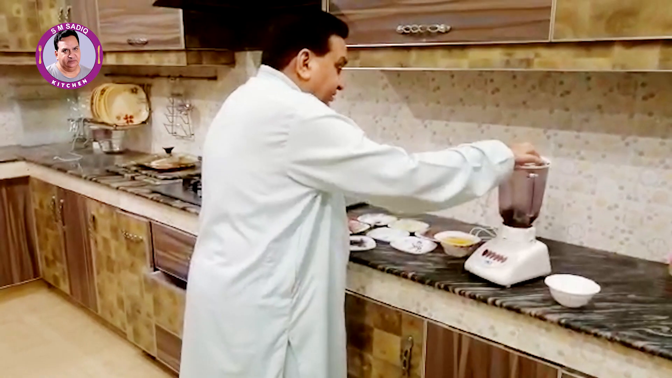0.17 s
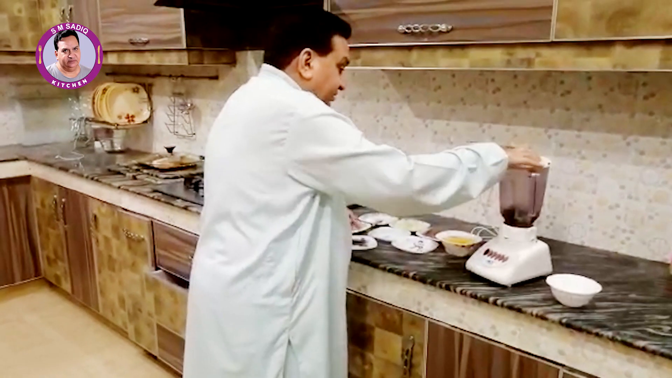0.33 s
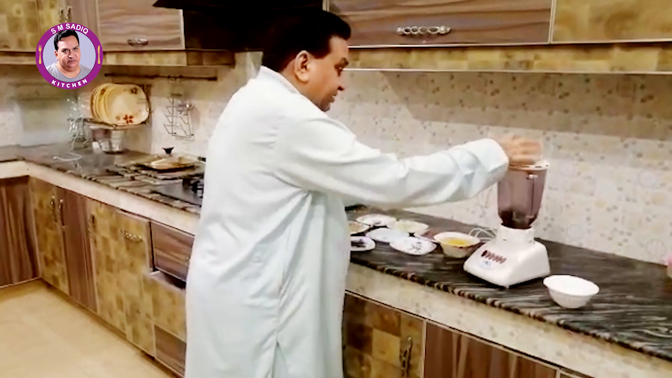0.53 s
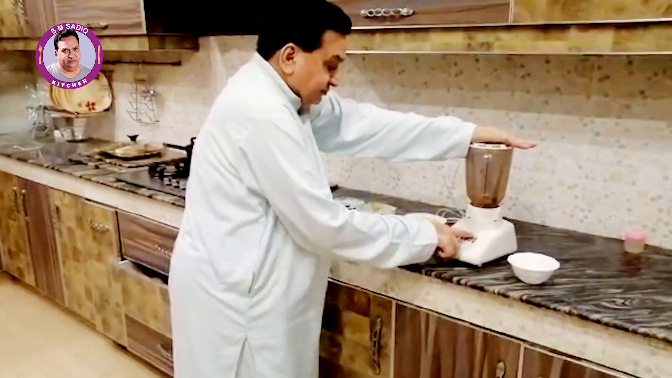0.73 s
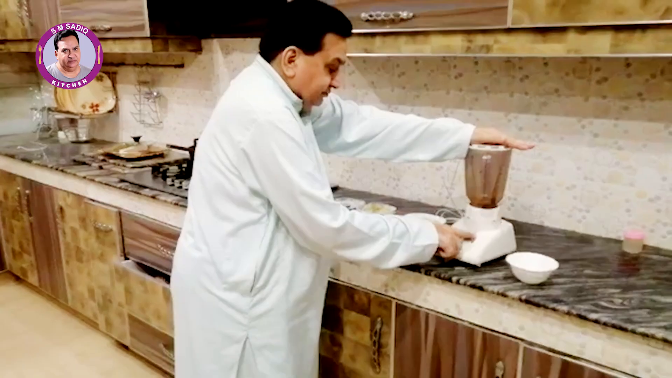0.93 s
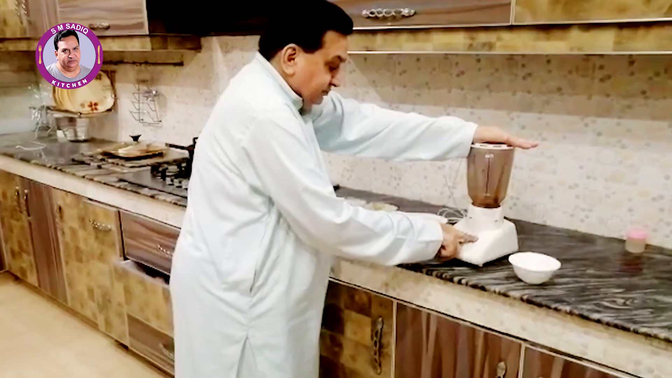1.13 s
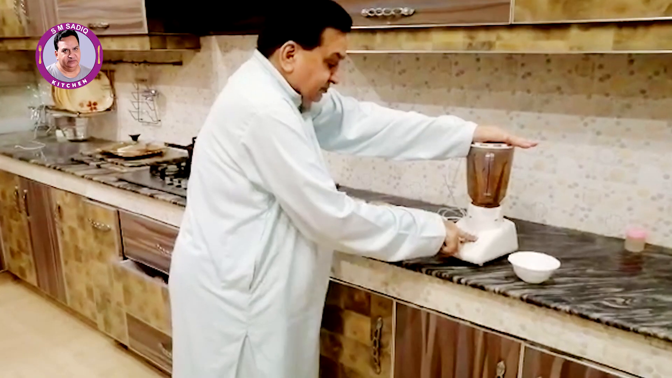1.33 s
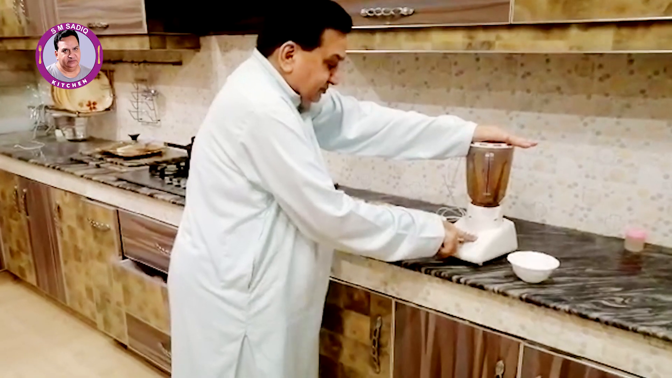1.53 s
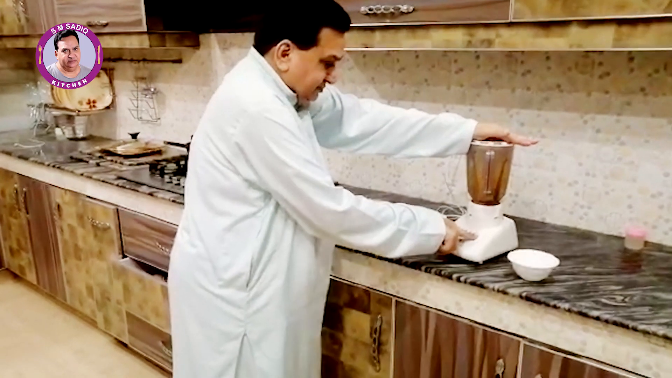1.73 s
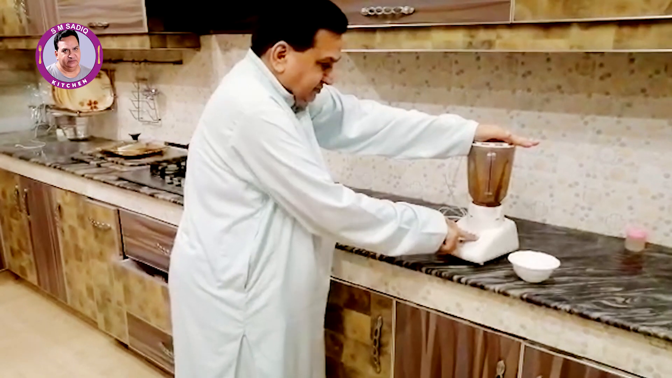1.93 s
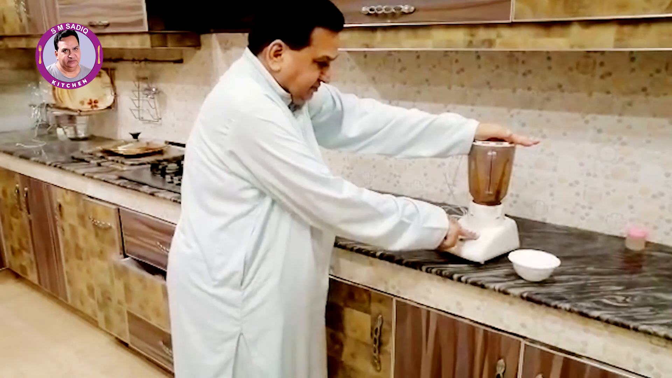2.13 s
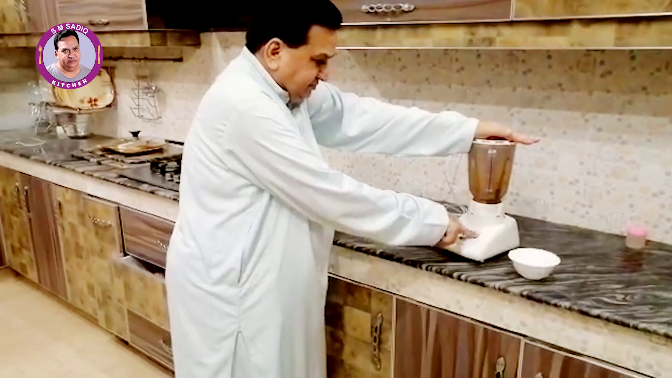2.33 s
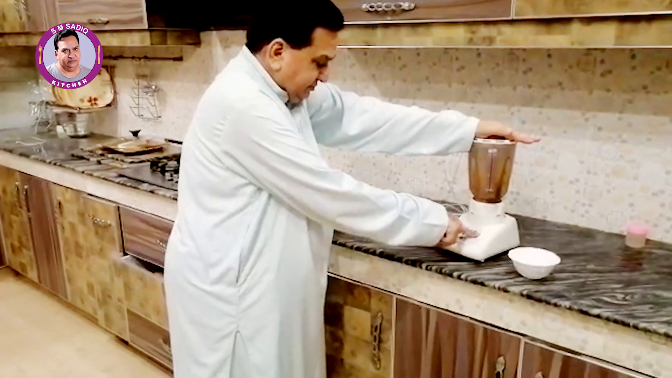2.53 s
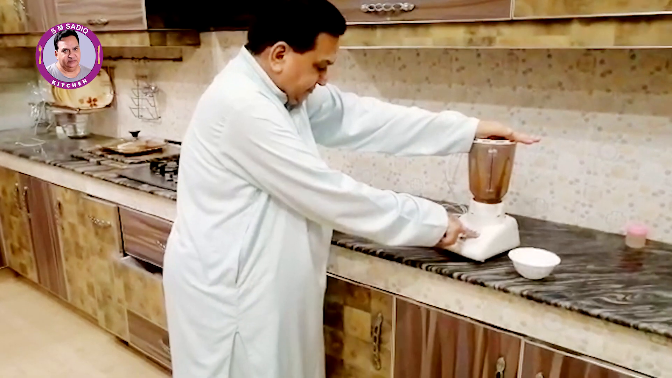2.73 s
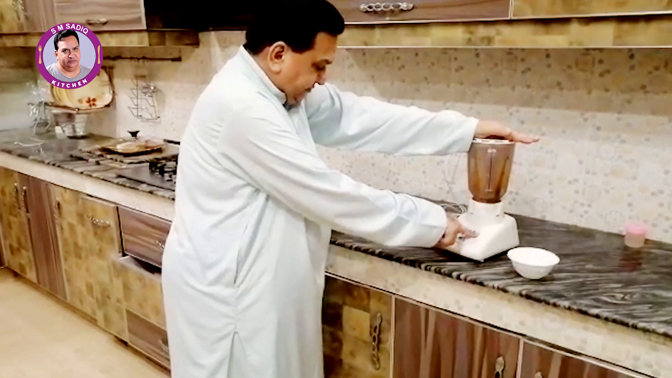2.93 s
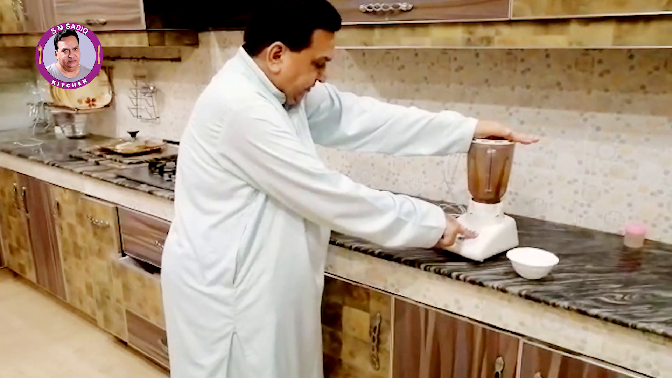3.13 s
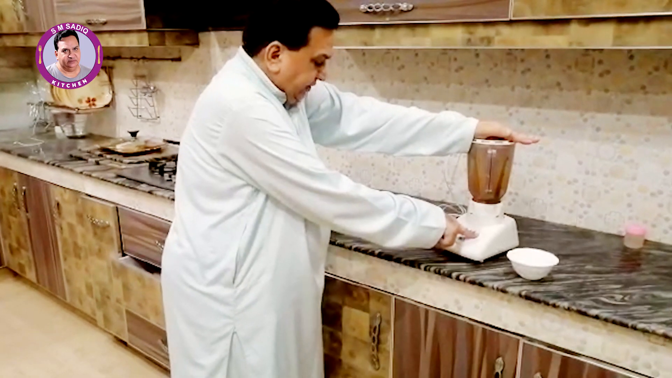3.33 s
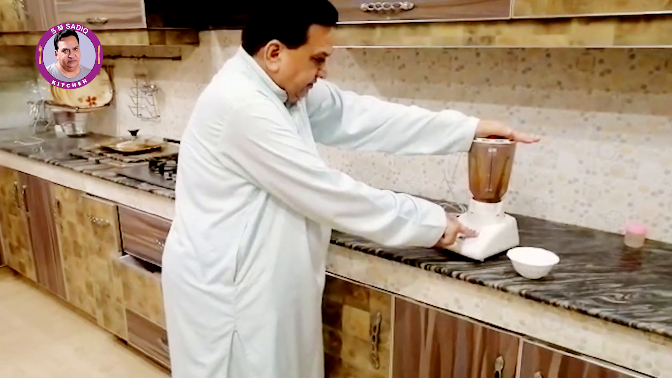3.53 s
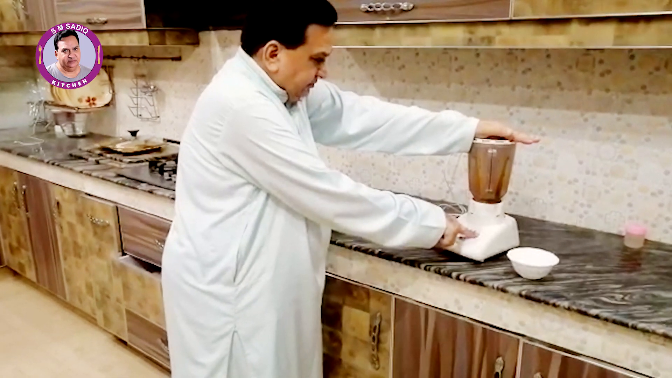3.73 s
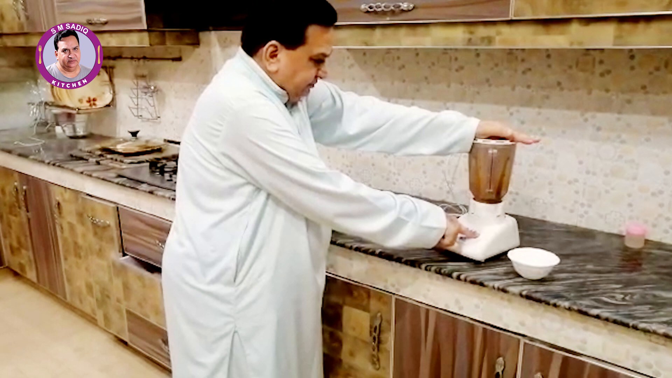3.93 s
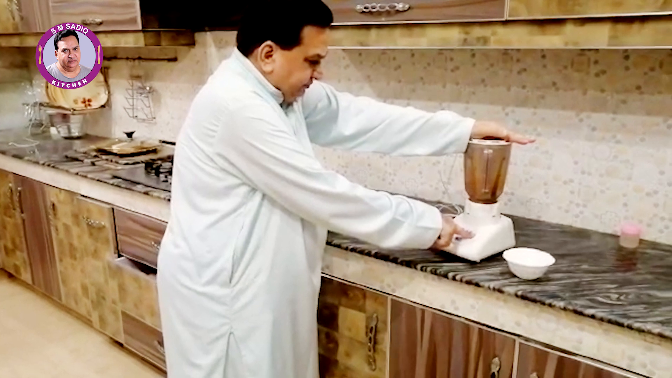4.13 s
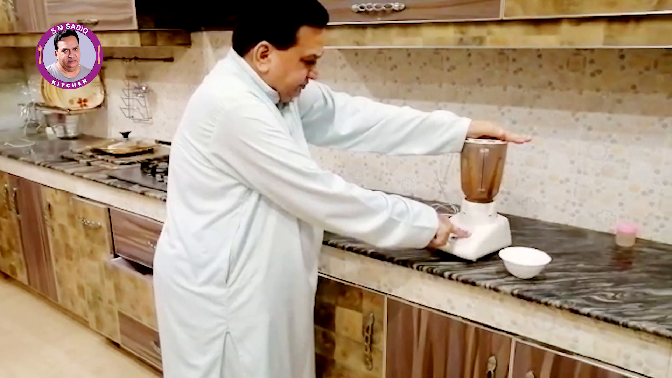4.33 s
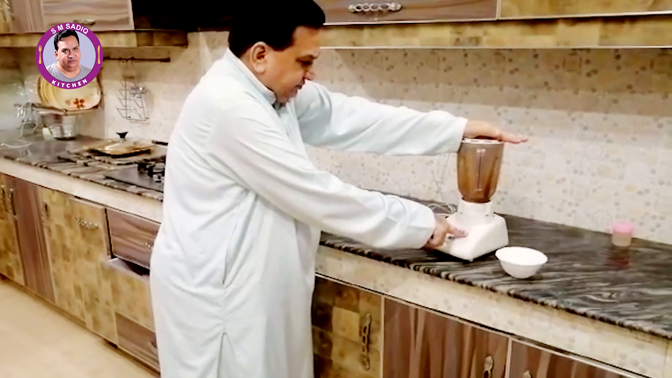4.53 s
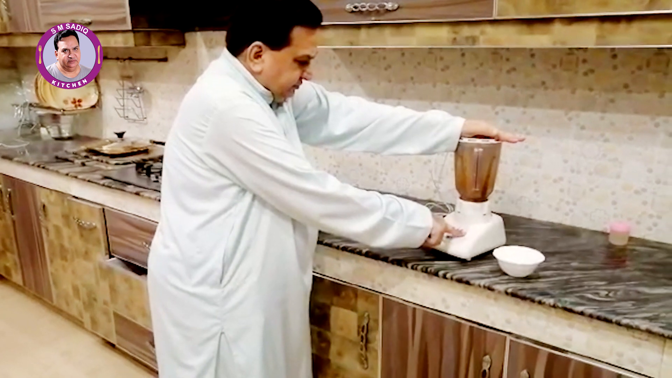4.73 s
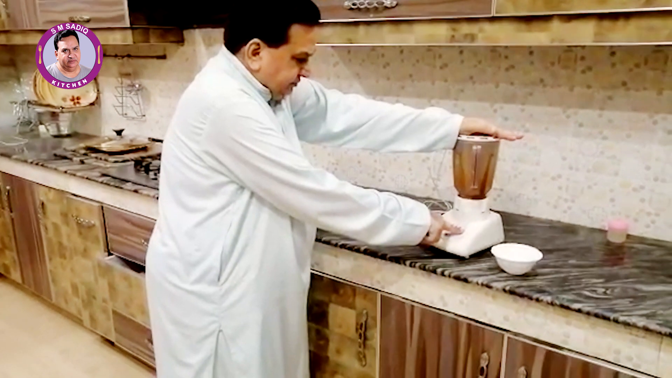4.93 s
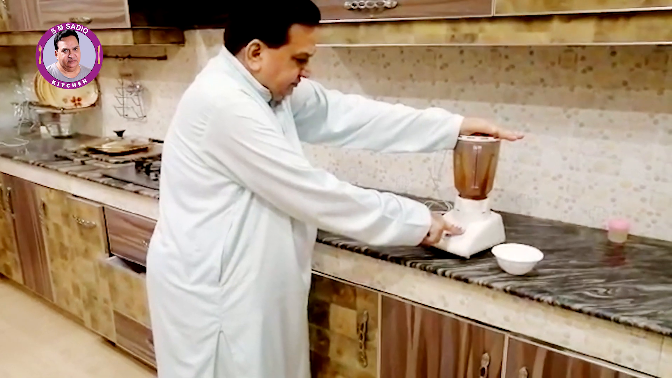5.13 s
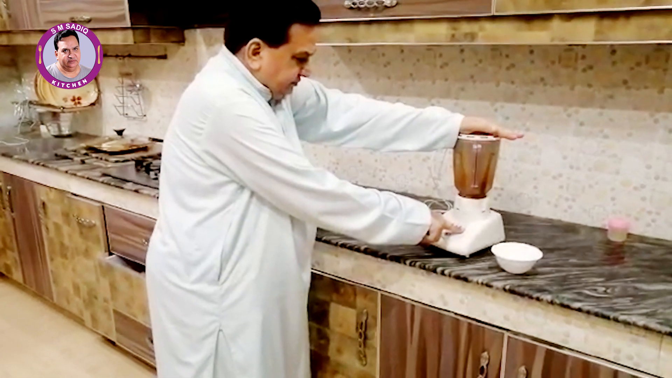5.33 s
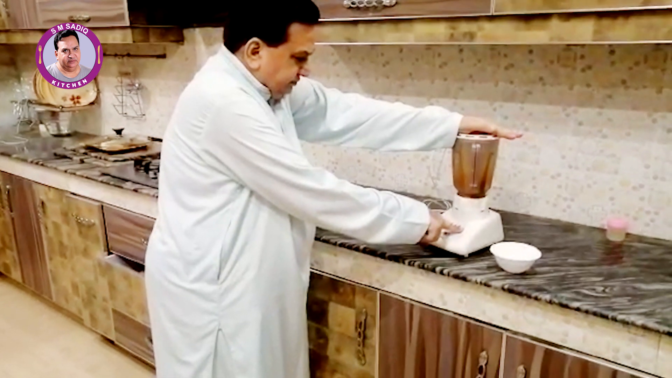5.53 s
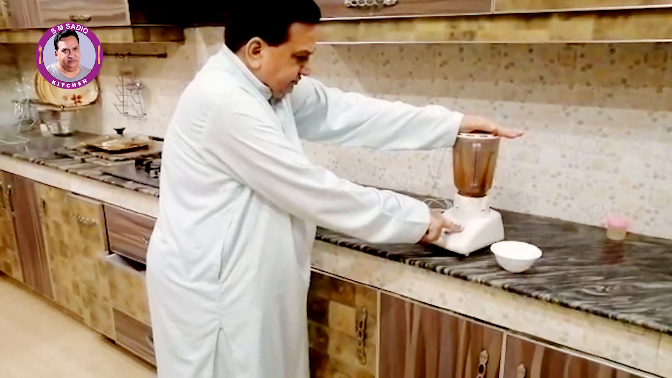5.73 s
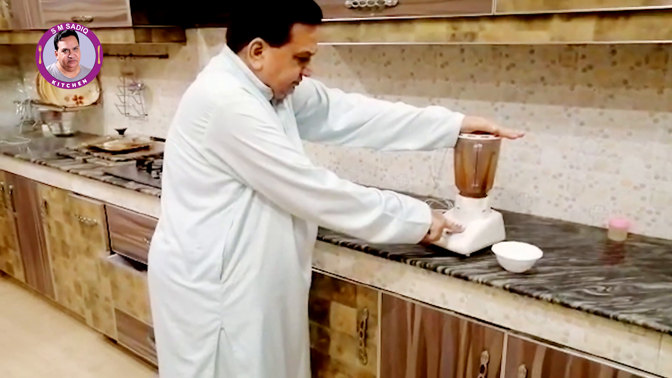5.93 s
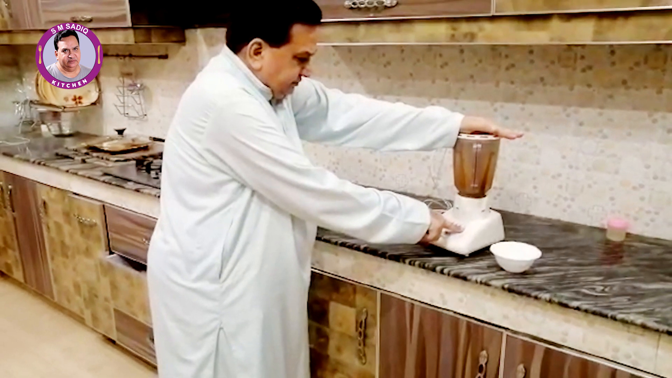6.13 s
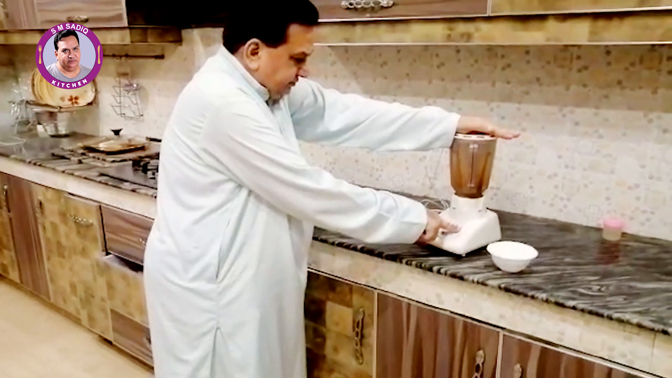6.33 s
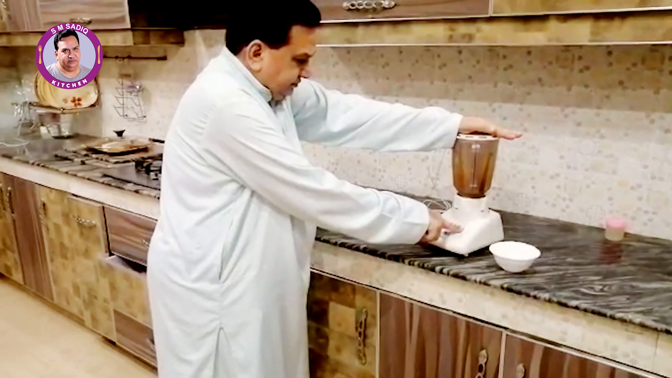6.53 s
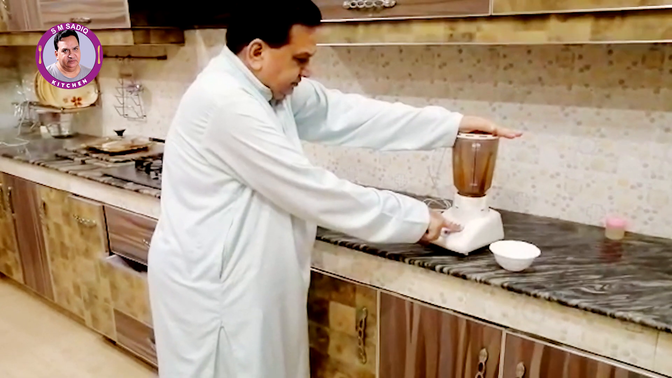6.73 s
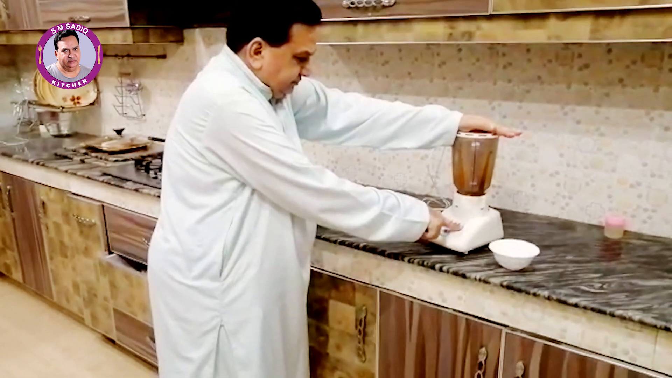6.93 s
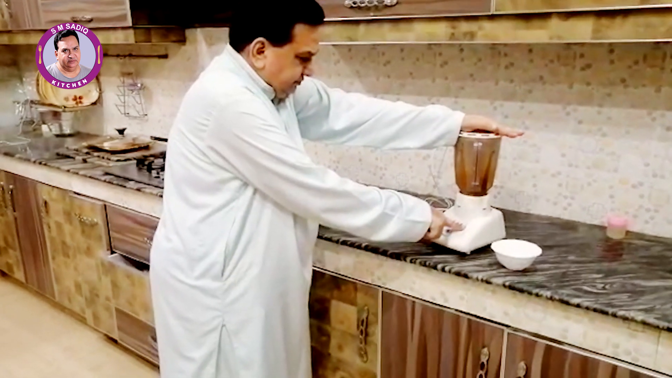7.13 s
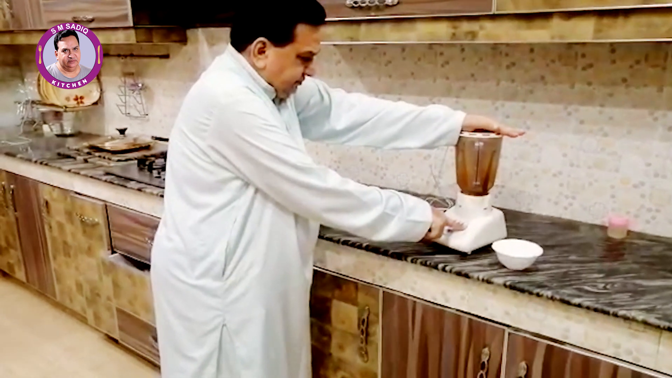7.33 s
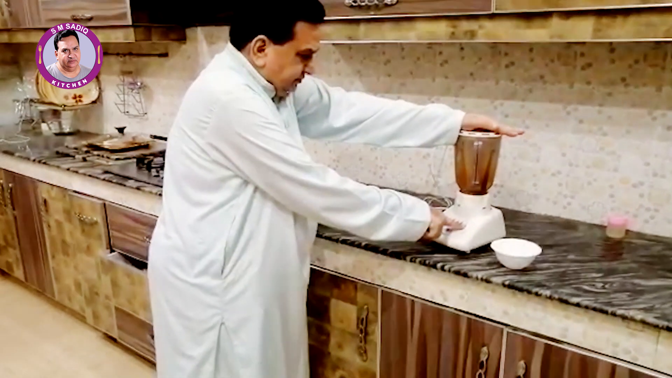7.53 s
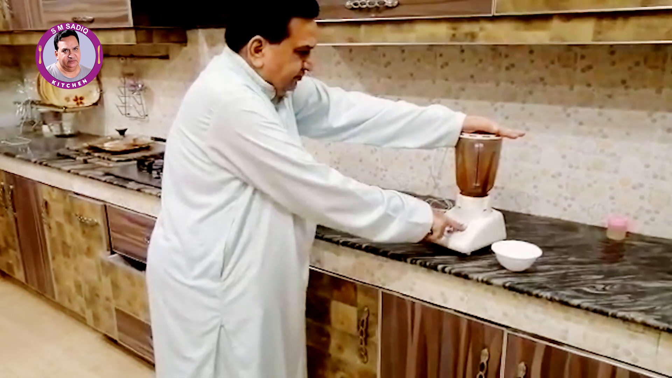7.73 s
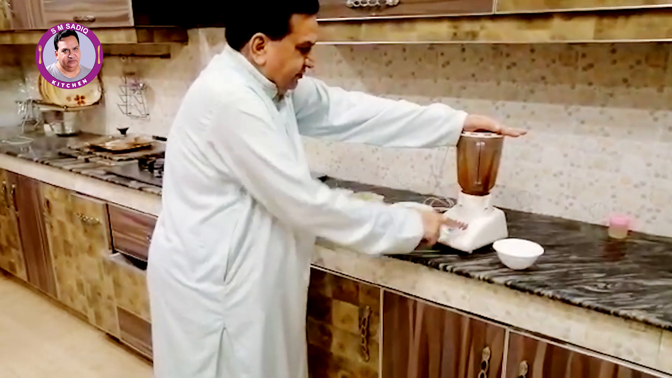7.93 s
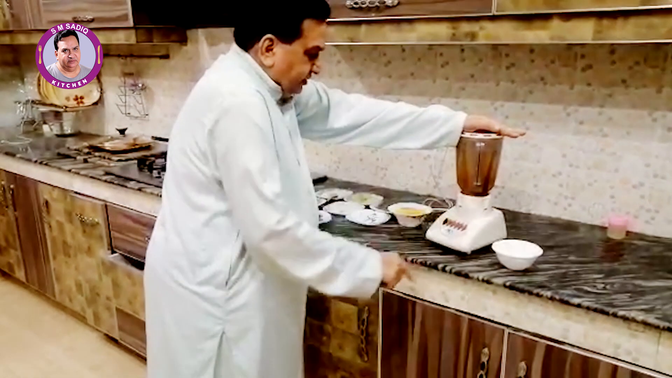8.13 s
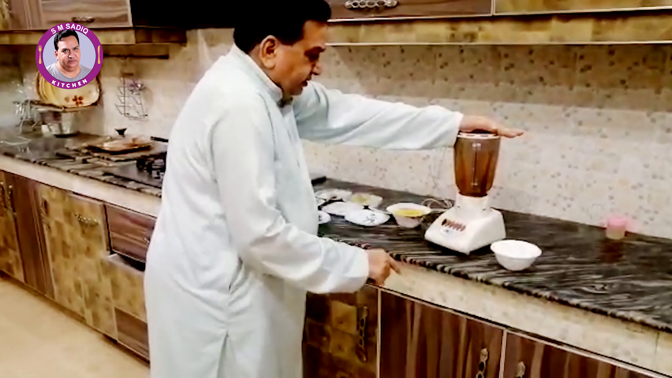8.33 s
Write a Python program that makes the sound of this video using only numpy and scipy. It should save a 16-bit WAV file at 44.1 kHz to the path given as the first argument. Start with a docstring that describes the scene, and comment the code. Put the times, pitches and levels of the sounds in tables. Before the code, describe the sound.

A quiet tiled kitchen with a faint noise floor. At about 0.05 to 0.1 s a plastic lid knocks onto a blender jar in a quick cluster, hollow and low, with another tap near 0.37 s. Near-silence follows until a small button click at 1.22 s. The motor starts at once, its pitch leaping up and then creeping higher; around 1.35 s there is a very short squeal, and by 1.6 s the blades have caught the liquid with a surge and a gulp. From about 2 to 7.9 s a loud, steady drone near 300 Hz holds, wavering slightly, with buzz, high motor whine, raspy churning and fluttering spray hiss. Brief gulps come near 3.1, 4.8, 6.5 and 7.7 s, and the pitch edges upward late. At 7.88 s the power cuts: the whine vanishes, the tone glides down and liquid slosh swells, still coasting at the end.

```python
"""A blender drones and churns in a tiled kitchen: low orders of its shaft, turning up to about 300 times
a second, glide through standing waves. Turbulence in the liquid is filtered noise; air and spray hiss.
The motor adds coupling buzz, commutator whine and fan whistle, all locked to the angle of the shaft.
First a lid knocks onto the jar and a button clicks, as noise cracks and decaying plastic modes;
at the end the motor is switched off and the shaft starts to coast down."""
import sys
import numpy as np
from scipy import signal
from scipy.fft import rfft, irfft, next_fast_len
from scipy.io import wavfile
from scipy.ndimage import uniform_filter1d

SR = 44100
rng = np.random.default_rng(int(sys.argv[2]) if len(sys.argv) > 2 else 0)


def generate_wav(signal):
    """Clip the signal to [-1, 1] and save it as 16-bit WAV at the path in sys.argv[1]."""
    frames = np.transpose(np.atleast_2d(signal))
    scaled = np.clip(frames, -1, 1) * 32767
    pcm = np.round(scaled).astype(np.int16)
    wavfile.write(sys.argv[1], SR, pcm)


N = 368631
TIME = np.arange(N) / SR

# response of the radiating jar and housing: f/Hz, left level/dB, right level/dB
BODY_RESPONSE = [(83, -59, -57), (279, -7, -1.5), (381, -13, -7.5), (543, -3.5, 1), (1630, 0.0, -4),
                 (2600, -6, -3.5), (3464, -3, -1), (3710, -16, -8), (4480, -11.5, -14.5), (5260, -4, -4.5),
                 (7020, -11, -0.5), (8470, -6, -18.5), (8900, -11.5, -17.5), (13600, -25.5, -22.5),
                 (15000, -27, -25.5)]
# air pockets caught by the blades: t/s, slosh level/dB, spray level/dB, decay time/s, speed sag/(turns/s)
AIR_POCKETS = [(1.635, -8.5, -40, 0.013, 0), (3.079, -12, -18.5, 0.053, 1.2), (4.8, -21, -24, 0.045, 1.2),
               (6.465, -19, -17, 0.033, 3), (7.685, -20, -26, 0.039, 0.2), (8.04, -19, -40, .07, 0)]

POWER_ON_S, POWER_OFF_S = 1.24, 7.884
CATCH_S, CATCH_RISE_S = 1.398, 0.2   # the blades drag the liquid into motion
SLOTS = 12   # armature slots, with two commutator bars to each


def from_db(db):
    """Level in decibels is the logarithm of amplitude; invert it to a gain."""
    return 10 ** (np.asarray(db) / 20)


def rms_one(x):
    """Normalise the mean power to 1."""
    return x / np.sqrt(np.mean(np.abs(x) ** 2) + 1e-20)


def since(s):
    """Elapsed seconds since a moment; zero before it."""
    return np.maximum(TIME - s, 0)


def at_hz(points, hz):
    """Interpolate each column of a spectrum on a logarithmic frequency axis."""
    known, *columns = np.transpose(points)
    return np.array([np.interp(np.log(hz + 1e-9), np.log(known), c) for c in columns])


def drift(rate, size=N):
    """Slow random modulation of unit spread: white noise through a two-pole low-pass."""
    step = 40   # drawn at every 40th sample, then interpolated
    pole = np.exp(-2 * np.pi * rate * step / SR)
    white = rng.standard_normal(N // step + 2002)
    slow = signal.lfilter([1], [1, -2 * pole, pole * pole], white)[2000:]   # drop the onset
    return np.interp(TIME[:size], np.arange(len(slow)) * step / SR, rms_one(slow))


def passed(x, hz, kind, order=2):
    """Butterworth filtering: a maximally flat passband."""
    edges = np.clip(hz, 10, .45 * SR)
    return signal.sosfilt(signal.butter(order, edges, kind, fs=SR, output="sos"), x + 1e-18)


def noise(spectrum, size=N):
    """Coloured stereo noise of unit rms; mid and side shares set the interchannel correlation."""
    # correlation between left and right: f/Hz, correlation
    likeness = [(50, 0.12), (130, 0.84), (350, 0.83), (700, 0.2), (1300, -0.61), (3000, 0.051)]
    padded = next_fast_len(size, True)
    hz = np.fft.rfftfreq(padded, 1 / SR)
    mid, side = rfft(rng.standard_normal((2, padded)))
    alike = np.clip(at_hz(likeness, hz), -1, 1)
    both = np.sqrt(1 + alike) * mid + np.sqrt(1 - alike) * side * [[1], [-1]]
    coloured = both * from_db(at_hz(spectrum, hz))
    return rms_one(irfft(coloured, padded)[:, :size])


def panned(pan_db):
    """Interchannel level difference, left over right, as a pair of gains."""
    return from_db(np.array([[.5], [-.5]]) * pan_db)


def partial(angle, order, scatter, rate):
    """Harmonic of a rotation with a scattered share: random quadrature modulation, separate on each side."""
    phase = (order * angle + rng.uniform(0, 2 * np.pi)) % (2 * np.pi)
    cosine, sine = np.cos(phase.astype(np.float32)), np.sin(phase.astype(np.float32))
    sides = []
    for _ in range(2):
        in_phase = np.sqrt(2) + scatter * drift(rate)
        quadrature = scatter * drift(rate)
        sides.append(in_phase * cosine - quadrature * sine)
    return np.array(sides) / np.sqrt(1 + scatter ** 2)


def quiet_kitchen(waver_db=3):
    """Ambient noise floor: stationary coloured noise and faint tones with wandering level and phase."""
    # background spectrum: f/Hz, relative level/dB
    floor = [(15, -36), (25, -13.5), (106, -17.5), (176, -7), (278, -18.5), (729, -21), (879, -11.5),
             (1500, -29), (2630, -25.5), (3930, -33.5), (5420, -27), (7680, -34), (8550, -26.5),
             (10300, -40), (15000, -40)]
    # high whistles of the idle kitchen: f/Hz, level/dB
    whistles = [(2659, -74), (5566, -68), (8236, -78), (8753, -77)]
    out = from_db(-49.5) * noise(floor)
    for hz, db in whistles:
        level = from_db(db + waver_db * drift(20))
        out = out + level * np.sin(2 * np.pi * hz * TIME + 3 * drift(25))
    return out


def dying(spectrum):
    """Diffuse-field decay: one second of dense reflections, each band fading exponentially at its own rate."""
    # decay of the room by 60 dB: f/Hz, reverberation time/s
    reverberation = [(150, 1), (400, 0.72), (1500, 0.56), (3000, 0.77), (7000, 0.64), (14000, 0.15)]
    wash, edges = noise(spectrum, size=SR), np.geomspace(80, 18000, 9)
    out, sign = 0, 1
    for low, high in zip(edges, edges[1:]):
        t60 = at_hz(reverberation, np.sqrt(low * high))
        out = out + sign * passed(wash, [low, high], "band") * from_db(-60 * TIME[:SR] / t60)
        sign = -sign   # opposite signs let neighbouring bands join without a notch
    return out


def kitchen(x):
    """Reverberation off tiles and cupboards: convolution with a diffuse tail of unit energy."""
    tail = dying([(100, 0), (15000, 0)])
    response = tail / np.sqrt(np.sum(tail ** 2) / 2)
    return signal.fftconvolve(np.atleast_2d(x), response, axes=1)[:, :N]


def knocks(rows, modes, swell_s, crack_db=-10, ring_db=-13, rise_s=0.0004, rattle=0.88):
    """Impact of plastic on plastic: a broadband crack in the room, and modes that swell, rattle and decay."""
    # crack of hard plastic: f/Hz, relative level/dB
    crack_spectrum = [(80, -47), (160, -4), (300, 3.5), (430, 4.5), (540, -5), (760, 4.5), (1250, -5),
                      (1750, -2.5), (2300, -6), (3300, -6.5), (4100, -18), (6600, -12), (10000, -22.5),
                      (14000, -37)]
    out, age = np.zeros((2, N)), TIME[:SR]
    for s, level_db, own_ring_db, bright_db in rows:
        crack = dying(crack_spectrum) * (1 - np.exp(-age / rise_s))
        crack = crack + (from_db(bright_db) - 1) * passed(crack, 2000, "high", order=1)
        ring = 0
        for hz, db, t60 in modes:
            mode = from_db(db - 60 * age / t60) * np.sin(2 * np.pi * (hz * age + rng.random()))
            ring = ring + mode * (1 + rattle * drift(22, size=SR))
        ring = ring * (1 - np.exp(-age / swell_s))
        knock = from_db(crack_db) * crack + from_db(ring_db + own_ring_db) * ring
        at = round(s * SR)
        out[:, at:at + SR] += from_db(level_db) * knock * panned(pan_db=1.5)
    return out


def lid_knocks():
    """Modal excitation of the lidded jar by the knocks of its lid."""
    # knocks of the lid: t/s, relative level/dB, relative ring level/dB, treble gain/dB
    lid = [(0.054, -13, -13, -8), (0.096, -14, -0.5, 0), (0.105, -12.5, 0, 8), (0.367, -16, -0.5, -4)]
    # modes of the lidded jar: f/Hz, relative level/dB, 60 dB decay time/s
    jar = [(140, -14, 0.64), (204, -5, 0.24), (275, 0, 0.99), (316.5, 3, 0.81), (371, -7.5, 1),
           (440, -15, 0.41), (605, -6, 0.67), (675, -11.5, 0.99)]
    return knocks(lid, jar, swell_s=0.014)


def button_clicks():
    """Modal excitation of a small push button by its own contact and its latch."""
    # button and latch: t/s, relative level/dB, relative ring level/dB, treble gain/dB
    button = [(1.224, -27.5, 5, 0), (1.246, -21, -10, -4)]
    # modes of the button: f/Hz, relative level/dB, 60 dB decay time/s
    latch = [(820, -12, .15), (1560, 10, 0.13), (1690, 1, .12), (2450, -8, .1), (6400, 1, .07)]
    return knocks(button, latch, swell_s=.001)


def thin_whistle(hz=8180, db=-40, db_per_s=-2.5):
    """Wavering tone of constant frequency, independent of the shaft: it sets in with the catch and fades."""
    level = np.clip(since(CATCH_S) / CATCH_RISE_S, 0, 1) * from_db(db + db_per_s * since(CATCH_S))
    return level * partial(2 * np.pi * hz * TIME, order=1, scatter=1.5, rate=20) * panned(pan_db=8)


def gulps(rise_s=0.01):
    """Transient bursts of air pockets: low slosh and high spit share a rise and an exponential decay."""
    burst = noise(BODY_RESPONSE)
    slosh = rms_one(passed(burst, [450, 1100], "band"))
    spit = rms_one(passed(burst, 5600, "high"))
    out = 0
    for s, slosh_db, spit_db, decay, _ in AIR_POCKETS:
        age = since(s)
        envelope = (1 - np.exp(-age / rise_s)) * np.exp(-age / decay)
        out = out + envelope * (from_db(slosh_db) * slosh + from_db(spit_db) * spit)
    return out


def stirring(steady_db, before_db, leap_db, coast_db_per_s, settle_s=0.69):
    """Load-driven level: it rises as the blades catch, overshoots, relaxes exponentially, ebbs after power-off."""
    caught = np.clip(since(CATCH_S) / CATCH_RISE_S, 0, 1)
    leap = caught * np.exp(-since(CATCH_S + CATCH_RISE_S) / settle_s)
    return steady_db + before_db * (1 - caught) + leap_db * leap + coast_db_per_s * since(POWER_OFF_S)


def spray(swing, swing_db=0.61, swirl_hz=9, swirl_db=1.9):
    """Broadband flow noise: brushes and fan hiss; the finest spray surges as the vortex swings round the jar."""
    # load-driven level: in the vortex/dB, before the catch/dB, leap/dB, while coasting/(dB/s)
    spray_drive = (-26, -9.5, 2, -5)
    spray_db = stirring(*spray_drive) + swing_db * swing
    air = noise(BODY_RESPONSE)
    swirl = np.sin(2 * np.pi * np.cumsum(swirl_hz * (1 + 0.22 * drift(2.8))) / SR)
    hiss_level = from_db(spray_db + 1.57 + .5 * drift(30))
    mist_level = from_db(spray_db - 4.5 + swirl_db * swirl + 1.1 * drift(90))
    hiss = rms_one(passed(air, [4200, 9500], "band", order=4)) * hiss_level
    mist = rms_one(passed(air, 9900, "high", order=4)) * mist_level
    return hiss + mist


def churn(angle, swing, swing_db=.8, chop=0.18, collapse_gain_db=3):
    """Turbulence noise: a slosh that swells as the vortex collapses, and a rasp amplitude-modulated once a turn."""
    # load-driven level: in the vortex/dB, before the catch/dB, leap/dB, while coasting/(dB/s)
    churn_drive = (-21, -6, 3.5, -4)
    churn_db = stirring(*churn_drive) + swing_db * swing
    turbulence = noise(BODY_RESPONSE)
    collapse_db = collapse_gain_db * np.clip((TIME - POWER_OFF_S) / 0.31, 0, 1)
    slosh_level = from_db(churn_db - 6.0 + collapse_db + 2.37 * drift(25))
    rasp_level = from_db(churn_db - 3.5 + 0.71 * drift(25))
    slosh = rms_one(passed(turbulence, 1295, "low", order=4)) * slosh_level
    rasp = rms_one(passed(turbulence, [1150, 4200], "band", order=4)) * rasp_level
    return slosh + rasp * (1 + chop * np.sin(angle))


def shaft_speed(wobble=0.001585, wobble_hz=11):
    """Rotational inertia: exponential run-up, sags at some gulps, and coasting; uneven load makes it waver."""
    # speed the motor can hold against the thinning liquid: t/s, speed/(turns/s)
    cruise = [(2.4, 296.7), (2.7, 294.9), (3.0, 294.0), (3.2, 292.9), (3.6, 292.8), (4.1, 293.4),
              (4.45, 295.7), (4.75, 295.0), (5.1, 295.6), (5.8, 294.6), (6.1, 296.8), (6.4, 298.5),
              (6.6, 297.3), (7.1, 298.3), (7.5, 300.4), (7.85, 301.8)]
    # a quick leap, then a slow creep that closes the remaining share of the speed
    leap_s, creep_s, creep_share = .076, .377, .449
    sag_s, coast_s = .07, 1.149   # delay of the deepest sag; time constant of coasting
    on = since(POWER_ON_S)
    run_up = 1 - creep_share * np.exp(-on / creep_s) - (1 - creep_share) * np.exp(-on / leap_s)
    sag = 0
    for s, *_, depth in AIR_POCKETS:
        age = since(s) / sag_s
        sag = sag + depth * age * np.exp(1 - age)
    cruise_s, cruise_speed = np.transpose(cruise)
    driven = np.interp(TIME, cruise_s, cruise_speed) * np.maximum(run_up, 0) - sag
    return driven * np.exp(-since(POWER_OFF_S) / coast_s) * (1 + wobble * drift(wobble_hz))


def spinning(speed, full_speed=223, steepness=5):
    """Radiation grows as a power of rotational speed, up to full_speed in turns/s."""
    return np.minimum(speed / full_speed, 1) ** steepness


def housing(hz):
    """Resonant transmission: gain of a sweeping tone through the body response and Lorentzian shell modes."""
    # resonances and one hollow of the motor shell: f/Hz, bandwidth/Hz, level/dB
    shell = [(913, 114, 13), (1077, 80, 10), (1202, 14, 1.5), (1276, 32, 9.5), (1537, 38, 10.5),
             (1643, 28, 8), (2114, 32, 5.5), (2330, 160, 5), (3000, 62, -2.5), (6600, 390, 4),
             (8650, 530, 18)]
    grid = np.linspace(0, 12000, 1200)
    shell_db = sum(db / (1 + (2 * (grid - centre) / width) ** 2) for centre, width, db in shell)
    gains = from_db(at_hz(BODY_RESPONSE, grid) + shell_db)
    return np.array([np.interp(hz, grid, side) for side in gains])


def squeal(angle, start_s=1.348, rise_s=0.032, db=-18, db_per_s=-66):
    """Brief drive squeal at the slot order as the load is taken up: linear attack, exponential decay."""
    level = np.clip(since(start_s) / rise_s, 0, 1) * from_db(db + db_per_s * since(start_s))
    return level * partial(angle, order=SLOTS, scatter=2.5, rate=90)


def motor(speed, angle, ripple=0.3, grip_db=.8, grip_hz=2, commutator_db=-29, fan_db=-36):
    """Shaft-order tones of coupling, commutator and fan, modulated by torque ripple at twice the mains rate."""
    # buzz of the coupling: order of the shaft, relative level/dB
    buzz_orders = [(4, -32), (5, -32.5), (6, -33.5), (7, -26.5), (8, -30), (9, -30), (10, -27), (11, -33)]
    # load-driven grip: in the vortex/dB, before the catch/dB, leap/dB, while coasting/(dB/s)
    grip_drive = (2, -4, 1.5, -13.5)
    mains_hz, fan_order = 50, 36
    throb = 1 + ripple * np.sin(2 * np.pi * 2 * mains_hz * TIME)
    pace = speed / speed.max()
    current = np.clip((POWER_OFF_S - TIME) / 0.031, 0, 1)   # the commutator whines only while it flows
    grip = from_db(stirring(*grip_drive) + grip_db * drift(grip_hz))
    buzz = 0
    for k, db in buzz_orders:
        buzz = buzz + from_db(db) * housing(k * speed) * partial(angle, order=k, scatter=0.87, rate=13.6)
    bars = 2 * SLOTS
    commutator = housing(bars * speed) * partial(angle, order=bars, scatter=0.65, rate=15)
    fan = housing(fan_order * speed) * partial(angle, order=fan_order, scatter=1.1, rate=25)
    running = grip * buzz + from_db(commutator_db) * current * commutator + from_db(fan_db) * fan
    return throb * (spinning(speed) * pace * running + squeal(angle))


def standing_db(hz, build_s=0.085):
    """Standing-wave interference: level of a gliding tone, averaged over the time a wave needs to build up."""
    # peaks and nulls between jar and microphones: f/Hz, bandwidth/Hz, left level/dB, right level/dB
    standing = [(207, 38, -13, -13.5), (246.1, 17.8, 13.5, 10.6), (256, 29.6, -10.6, -11.3),
                (290.5, 2.2, -15.0, -9.9), (440, 54, -9, -15.0), (536, 18.8, 18, -5), (564.5, 18, 14, 19),
                (583.3, 2.45, 9, 15.5), (600.5, 6.2, 17.5, -12), (773, 36, 15, 17), (843.4, 26, 2.5, 18),
                (866.4, 18.5, 15.5, -1.5), (879, 10.9, 4.5, 15.0), (894.3, 21.2, 15.5, 11.5)]
    grid = np.linspace(0, 1000, 4000)
    pattern = 0
    for centre, width, left, right in standing:
        pattern = pattern + np.array([[left], [right]]) / (1 + (2 * (grid - centre) / width) ** 2)
    heard = np.array([np.interp(hz, grid, side) for side in pattern])
    return uniform_filter1d(heard, round(build_s * SR), axis=1)


def blades(speed, angle, flutter=0.11, flutter_hz=20, scatter=4, scatter_hz=11, coast_db_per_s=-6):
    """Imbalance and blade passing: strong low orders, part steady in standing waves, part scattered by liquid."""
    # drone: order of the shaft, steady level/dB, its pan/dB, scattered level/dB, its pan/dB
    drone = [(1, -23.5, -4.9, -41, -3), (2, -35.5, -7.7, -30, -5.5), (3, -36, 0, -30, -1)]
    out = 0
    for k, db, pan_db, scattered_db, scattered_pan_db in drone:
        steady = partial(angle, order=k, scatter=flutter, rate=flutter_hz)
        steady = steady * from_db(db + standing_db(k * speed))
        scattered = from_db(scattered_db) * partial(angle, order=k, scatter=scatter, rate=scatter_hz)
        out = out + steady * panned(pan_db) + scattered * panned(scattered_pan_db)
    return spinning(speed) * out * from_db(coast_db_per_s * since(POWER_OFF_S))


def scene(swing_hz=6):
    """Superposition of lid, button and running blender over the quiet of the kitchen."""
    speed = shaft_speed()
    angle = 2 * np.pi * np.cumsum(speed) / SR
    swing = drift(swing_hz)   # the vortex swings, and churn and spray swell with it
    powered = np.clip((TIME - POWER_ON_S) / 0.015, 0, 1)
    rush = powered * (churn(angle, swing) + spray(swing)) + gulps()
    motor_sound = motor(speed, angle)
    motor_in_room = from_db(-2.2) * motor_sound + from_db(-7.5) * kitchen(motor_sound)
    tones = blades(speed, angle) + motor_in_room + thin_whistle()
    return tones + rush + lid_knocks() + button_clicks() + quiet_kitchen()


def record(dry, left_lag_s=.00014, cutoff_hz=15600):
    """Interchannel delay and band limit: the left side lags slightly; an elliptic low-pass cuts the top steeply."""
    left = np.pad(dry[0], (round(left_lag_s * SR), 0))[:N]
    low_pass = signal.ellip(10, .2, 80, cutoff_hz, fs=SR, output="sos")
    return signal.sosfilt(low_pass, np.array([left, dry[1]]))


dry = scene()
out = record(dry)
generate_wav(out)
```